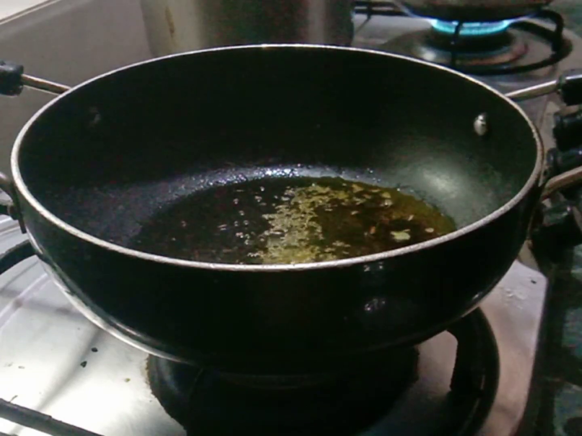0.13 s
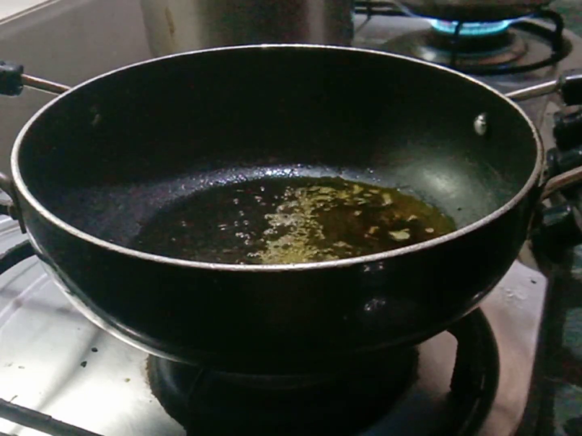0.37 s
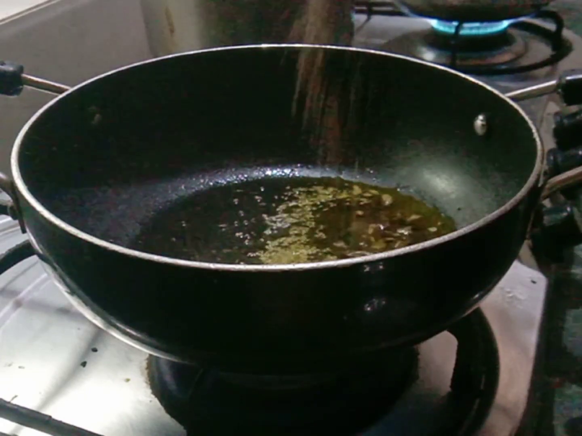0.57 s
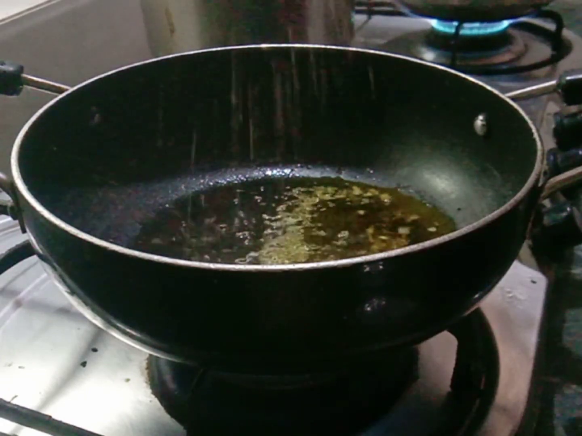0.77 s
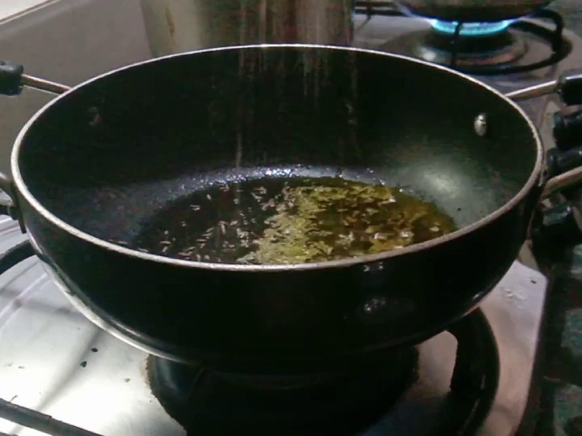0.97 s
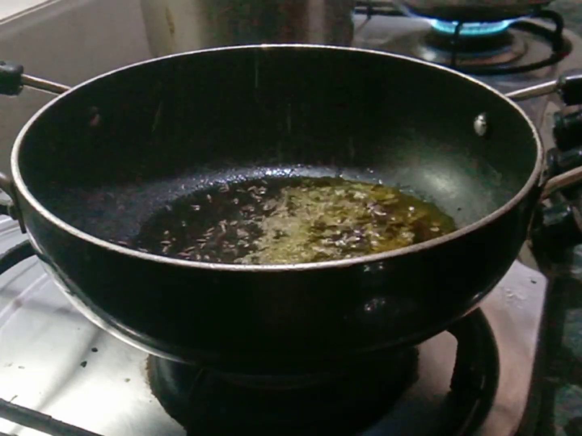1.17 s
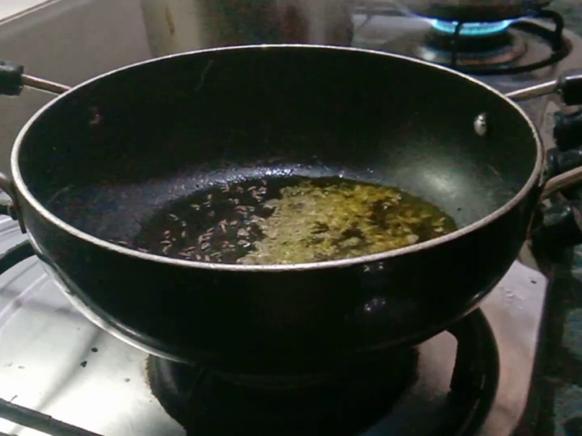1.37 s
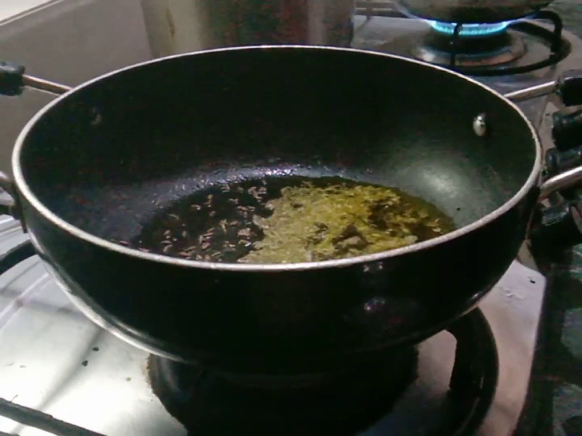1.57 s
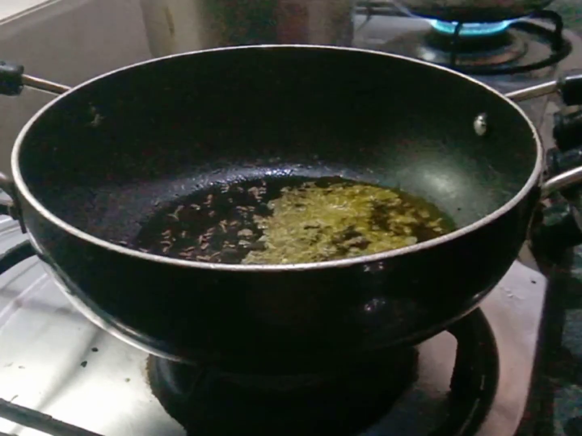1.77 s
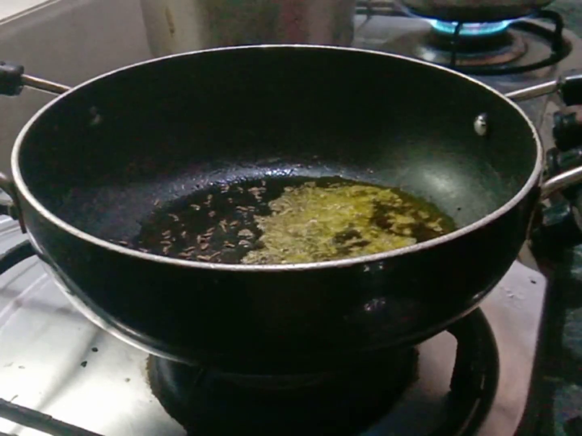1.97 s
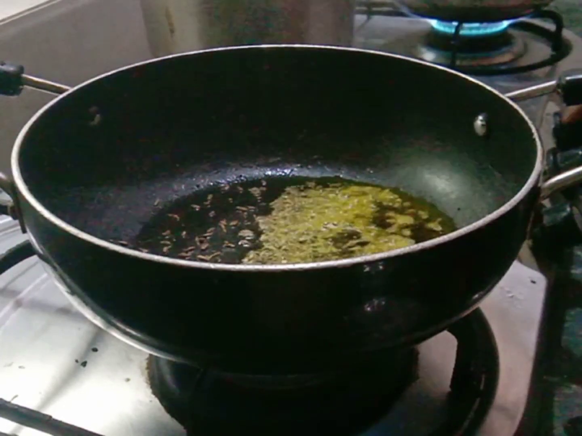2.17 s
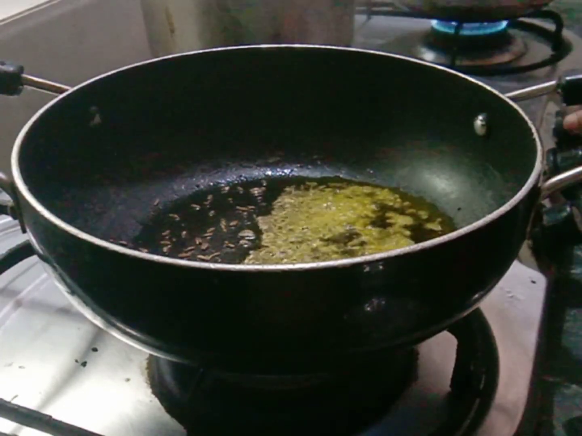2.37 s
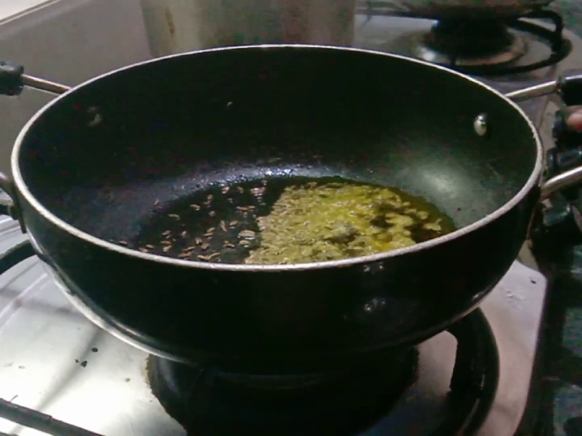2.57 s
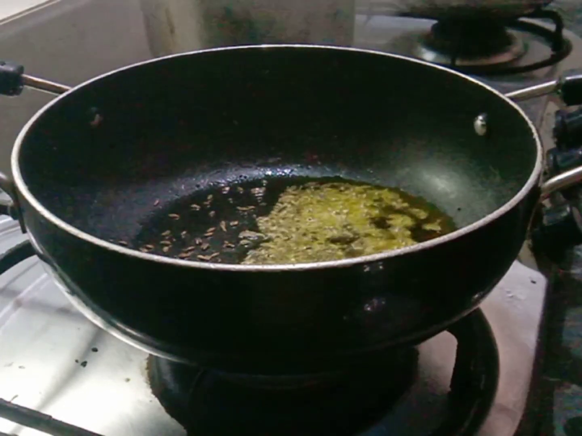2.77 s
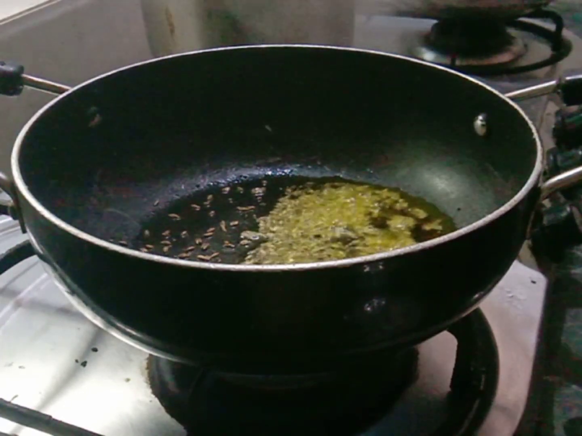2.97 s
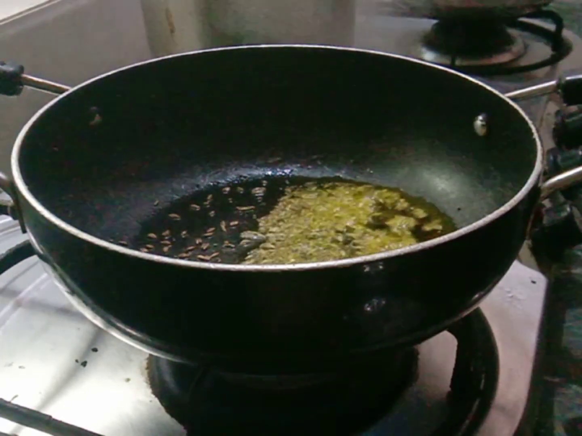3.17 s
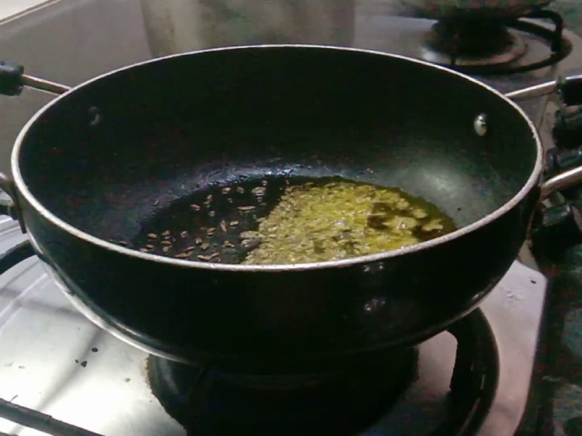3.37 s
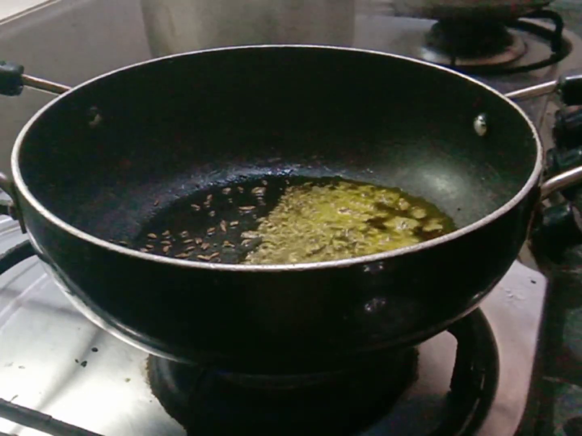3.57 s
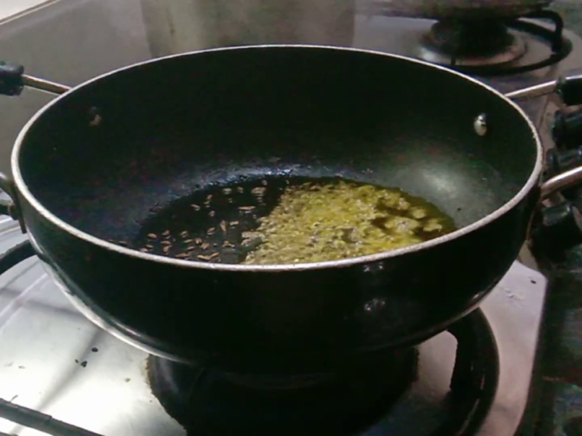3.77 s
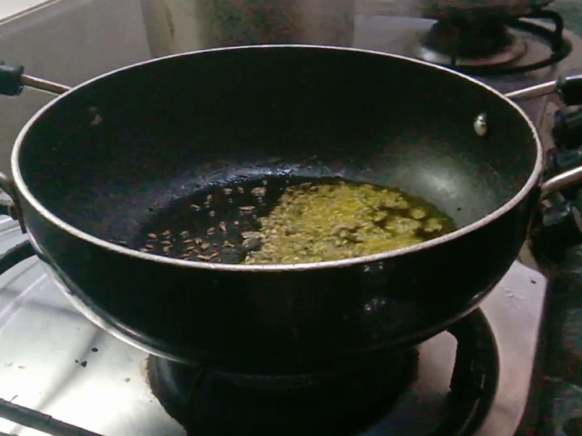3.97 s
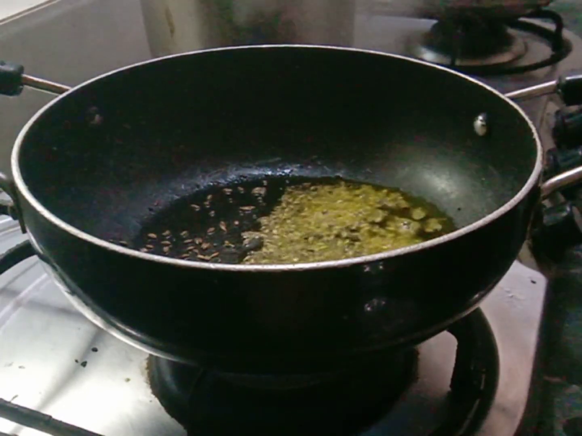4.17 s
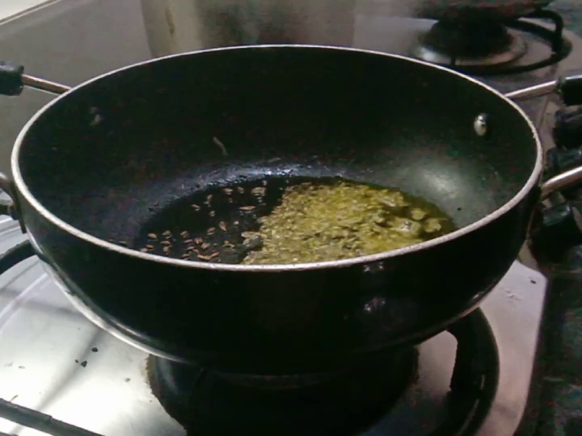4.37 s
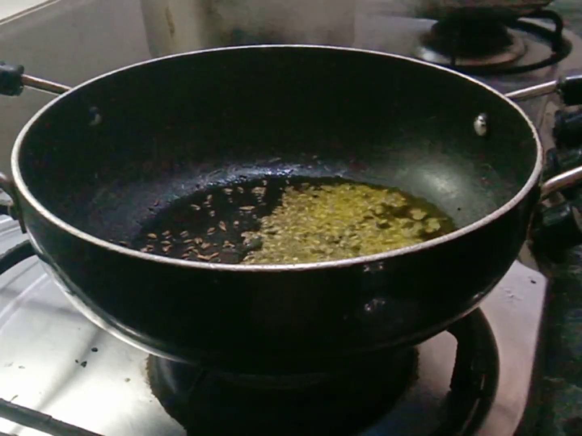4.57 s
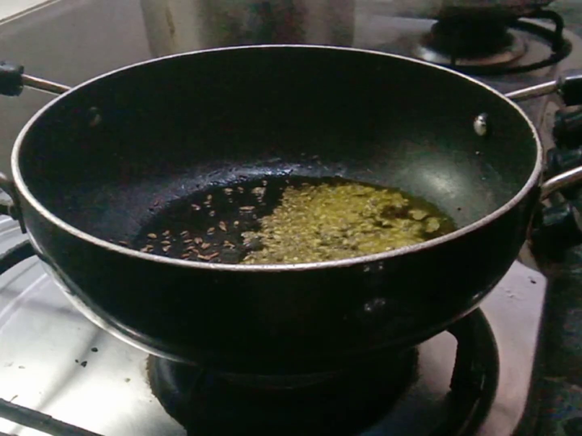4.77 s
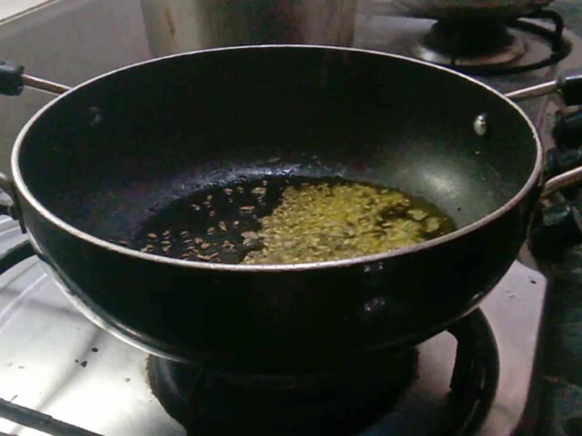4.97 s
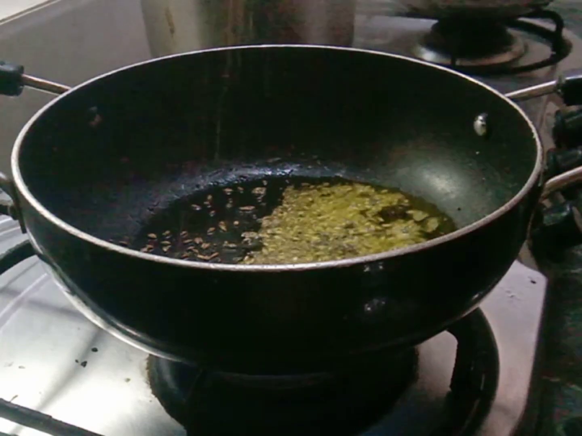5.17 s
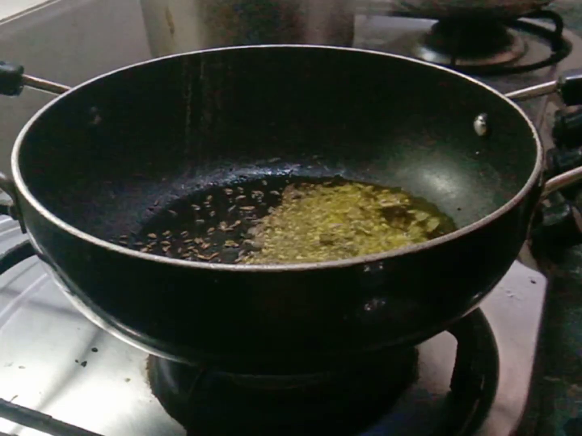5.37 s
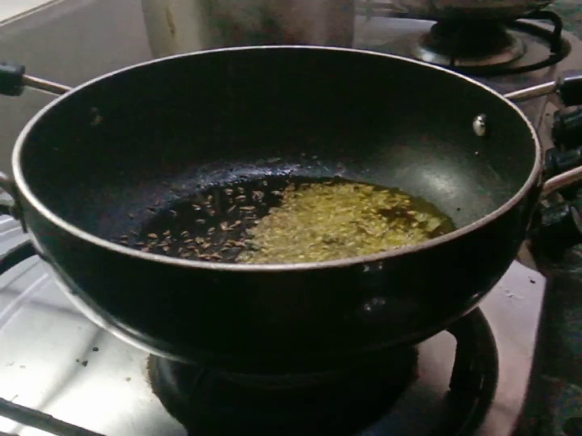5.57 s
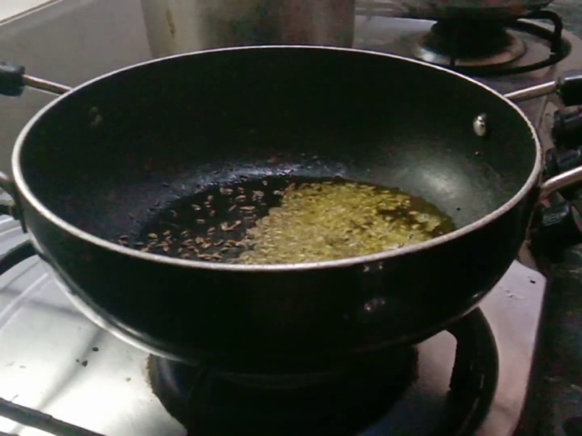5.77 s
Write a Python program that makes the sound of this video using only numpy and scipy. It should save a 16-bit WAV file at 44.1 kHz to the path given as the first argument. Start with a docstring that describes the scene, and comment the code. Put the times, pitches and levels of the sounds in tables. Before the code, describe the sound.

For the first half second, seeds burst in a quick run of sharp, dry pops in a deep pan, over the soft sizzle of simmering oil. At about 0.5 seconds a pressure cooker gives a low puff, and a loud, bright jet of steam swells to full strength by 0.7 seconds. This even, fizzy hiss dominates until the end, near 5.8 seconds, weakening only slightly. Single seed pops poke through around 1 second, at 4.1 seconds and more faintly around 5 seconds. At 2.3 seconds the stove knob makes a quiet, quick double knock. A few soft, low thuds are scattered far beneath the hiss, along with a faint low roar of gas flame and venting steam that fades through the second half. Everything is close to the microphone, in mono, with short kitchen reflections.

```python
"""A pressure cooker lifts its weight: a low puff, then a loud turbulent steam jet that slowly weakens.
Seeds burst in hot oil in a deep pan on the same gas stove, each a brief pressure pulse; most pop before
the jet starts. The stove knob knocks twice. Beneath lie a few soft thuds, the simmering oil and the low
roar of flame and vent. Air resonances of the pan and reflections in the kitchen colour the sound at a
close mono microphone."""
import sys
import numpy as np
from scipy import signal
from scipy.fft import rfft, irfft, next_fast_len
from scipy.io import wavfile
from scipy.ndimage import uniform_filter1d, map_coordinates

SR = 44100
rng = np.random.default_rng(int(sys.argv[2]) if len(sys.argv) > 2 else 0)


def inscribe(sig):
    """Save sig as 16-bit PCM at rate SR to the path in sys.argv[1].

    A 1-D sig is mono; a 2-D sig holds one channel per row.
    Samples are clipped to [-1, 1] before scaling.
    """
    pcm = np.round(np.clip(np.atleast_2d(sig).T, -1, 1) * 32767)
    wavfile.write(sys.argv[1], SR, pcm.astype(np.int16))


N = 256662
TIME = np.arange(N) / SR


# the jet rises as the weight lifts and falls with the pressure: (time [s], hiss [dB], fizz [dB])
JET_LEVELS = [(0.52, -44, -47), (0.54, -33.5, -31), (0.565, -27, -24), (0.61, -21, -17),
              (0.63, -19.5, -15.5), (0.72, -18.5, -13.5), (0.77, -20.5, -13.5), (0.9, -19, -14),
              (1.1, -21, -12.5), (1.35, -22.5, -14.5), (2.0, -21.5, -14.5), (2.7, -21.8, -16),
              (2.9, -22.5, -16.5), (3.2, -22, -16), (4.0, -23.5, -14.5), (4.35, -23, -17),
              (5.0, -25, -17.5), (5.82, -24.5, -20)]
# spectra of the hiss and of the higher fizz: (frequency [Hz], relative level [dB])
HISS_SPECTRUM = [(590, -23.5), (1000, -23), (1250, -14), (1660, -14), (3670, -1.5), (4430, -5),
                 (4820, -1.5), (6220, -2), (7370, 1.5), (9500, -9), (12400, -77), (20900, -120)]
FIZZ_SPECTRUM = [(5000, -45), (8500, -20), (9300, -13), (11000, -11), (13000, -12), (13600, -13),
                 (14000, -12), (14300, -7), (14600, -2), (15000, -1.5), (15500, -2)]
def steam_jet():
    """Turbulence radiates hiss and fizz, modulated by one unsteady flow; puff and knob are mixed in."""
    hiss_db, fizz_db = level_curves(JET_LEVELS)
    flow_db = 0.17 * wobble(14) + 0.42 * wobble(40)
    drops = spatter(share=0.003, spread_db=0.62, t60=0.011)
    hiss = amp(hiss_db + flow_db) * flow_noise(HISS_SPECTRUM, patch_db=0.86, grain=drops ** 0.13)
    fizz_gain = amp(fizz_db + flow_db + 0.36 * wobble(16))
    fizz = fizz_gain * flow_noise(FIZZ_SPECTRUM, patch_db=0.63, grain=drops ** 0.11)
    return hiss + fizz + puff_and_knob(grain=drops ** 0.13)


# a low puff as the weight lifts, then a short double knock of the stove knob:
# (time [s], level [dB], rise [s], hold [s], T60 [s])
PUFF_AND_KNOCKS = [(0.551, -30, 0.038, 0.067, 0.42), (2.304, -28.5, 0.013, 0.007, .04),
                   (2.328, -34, 0.0078, .01, 0.064)]
# their common spectrum: (frequency [Hz], relative level [dB])
PUFF_KNOCK_SPECTRUM = [(120, -54), (200, -27), (635, -7), (1090, -10.5), (1210, -4), (2140, -7.5),
                       (2360, -9), (3000, -14.5), (3900, -31), (6600, -120)]
def puff_and_knob(grain):
    """Transients of one noise band: a long decay is heard as a puff, a short one as a knock."""
    envelope = sum(amp(db) * swell(TIME - onset, *shape) for onset, db, *shape in PUFF_AND_KNOCKS)
    return envelope * flow_noise(PUFF_KNOCK_SPECTRUM, patch_db=2.7, grain=grain)


# bursting seeds: (time [s], relative level [dB], knock offset [dB])
SEED_BURSTS = [(0.0224, -12, -33), (0.0405, -10, -35), (0.0574, -22, -29), (0.102, -18, -32),
               (0.1102, -9.5, -24), (0.12, -13.5, -19), (0.1534, -12, -33), (0.165, -13, -39),
               (0.18, -9.5, -14.5), (0.214, -14.5, -21), (0.262, -20, -27), (0.269, -9, -17),
               (0.3057, -13, -37), (0.3301, -14, -14), (0.3568, -13, -19), (0.4056, -10.5, -38),
               (0.4764, -28, -24), (0.4814, -9.5, -32), (0.5214, -12, -10), (0.528, -10, -31),
               (0.541, -11, -24), (0.989, -1, -24), (1.0982, -6, -26), (4.07, -9, -26), (4.83, -19, -31),
               (4.8994, -16, -26), (5.0508, -11, -24), (5.1786, -19, -26)]
# broad resonances of the microphone ports: (frequency [Hz], bandwidth [Hz], gain [dB])
PORT_MODES = [(3450, 1500, -16), (7240, 12000, -7.5), (15000, 3300, 5)]
def seed_pops():
    """Each burst snaps, sputters and knocks the pan; a source this small radiates little bass."""
    pops, t = np.zeros(N + SR), np.arange(SR // 5) / SR
    for onset, db, knock_db in SEED_BURSTS:
        noise = rng.standard_normal(len(t))
        snap = -decay(t, t60=0.0005) * (1.5 + 0.2 * noise) * np.cos(2 * np.pi * 7000 * t)
        sputter = amp(-15) * decay(t, t60=0.041) * noise
        knock = amp(knock_db - 3) * decay(t, t60=0.018) * np.sin(2 * np.pi * 1250 * t)
        start = round((onset + 0.0004) * SR)  # the snap sounds 0.4 ms after the listed time
        pops[start:][:len(t)] += amp(db - 10.5) * (snap + sputter + knock)
    colour = lambda hz: highpass(hz, corner_hz=2500) * pan_cavity(hz) * resonances(hz, PORT_MODES)
    return filtered(pops[:N], colour)


# soft thuds: (time [s], level [dB], frequency [Hz])
SOFT_THUDS = [(0.18, -44, 304), (0.984, -41, 356), (1.16, -50, 406), (2.179, -41.5, 408), (2.306, -43, 360),
              (2.329, -36, 340), (3.061, -46, 302), (3.499, -49, 99.6), (3.849, -44.5, 330),
              (4.315, -47, 86.1), (5.32, -50, 325), (5.564, -51, 323), (5.695, -44.5, 272)]
def thuds():
    """Each thud is a damped low oscillation with a dull puff; the microphone drops the deepest part."""
    track, t = np.zeros(N + SR), np.arange(SR // 4) / SR
    for onset, db, pitch_hz in SOFT_THUDS:
        puff = 3.5 * uniform_filter1d(rng.standard_normal(len(t)), size=24)
        envelope = amp(db) * (1 - np.exp(-t / 0.0019)) * decay(t, t60=0.1)
        track[round(onset * SR):][:len(t)] += envelope * (np.sin(2 * np.pi * pitch_hz * t) + puff)
    return filtered(track[:N], lambda hz: highpass(hz, corner_hz=30) ** 2)


# spectrum of the bubbling oil: (frequency [Hz], relative level [dB])
OIL_SPECTRUM = [(470, -45), (800, -9), (988, -26), (1230, -10), (1680, -7.5), (3090, -4.5), (4370, -2.5),
                (6910, 2.5), (8010, -0.5), (12500, -3.5), (15400, 1.5)]
def simmering_oil():
    """Many small bubbles superpose into a fine-grained noise."""
    bubbles = spatter(share=0.002, spread_db=1.5, t60=0.013)
    return amp(-40 + 0.44 * wobble(18)) * flow_noise(OIL_SPECTRUM, patch_db=0.8, grain=bubbles ** 0.38)


# roar of flame and vent, weaker once the gas is off: (time [s], level [dB])
ROAR_LEVELS = [(0.0, -55), (0.5, -61.5), (0.6, -31), (0.72, -44), (2.55, -45.5), (2.8, -48), (3.6, -49.5),
               (4.2, -53.5), (5.0, -60.5), (5.82, -59)]
# spectra of the roar and of the deeper rumble: (frequency [Hz], relative level [dB])
ROAR_SPECTRUM = [(120, -52), (200, -8.5), (605, -2.5), (651, -2.5), (1080, -5.5), (1250, -6), (1400, -6.5),
                 (1820, -7), (3080, -120)]
RUMBLE_SPECTRUM = [(18, -47), (30, -23), (123, -0.5), (250, -9), (320, 1), (550, -120)]
def flame():
    """Turbulence of flame and vent radiates a low roar; a lumpy rumble follows its level."""
    roar_db, = level_curves(ROAR_LEVELS)
    roar = amp(roar_db) * flow_noise(ROAR_SPECTRUM, patch_db=3.2, grain=amp(1.2 * wobble(10)))
    lumps = amp(2.3 * wobble(12) + 2.0 * wobble(3.63))
    rumble_db = -62 + 0.8 * (roar_db + 45)
    return roar + amp(rumble_db) * flow_noise(RUMBLE_SPECTRUM, patch_db=4.2, grain=lumps)


# faint steady tone in the kitchen: (frequency [Hz], rms level [dB])
ROOM_TONE = [(861.3, -69.5)]
# noise floor of room and microphone: (frequency [Hz], relative level [dB])
FLOOR_SPECTRUM = [(18, -6), (40, 2), (120, 4), (300, -12), (600, -33)]
def background():
    """A slightly amplitude-modulated sinusoid lies over a low noise floor."""
    tone = sum(amp(db + 1.3 * wobble(9)) * np.sqrt(2) * np.sin(2 * np.pi * hz * TIME)
               for hz, db in ROOM_TONE)
    return tone + amp(-76.5) * flow_noise(FLOOR_SPECTRUM, patch_db=1.5, grain=1)


# air modes of the pan and the stove corner: (frequency [Hz], bandwidth [Hz], gain [dB])
AIR_MODES = [(1215, 40, -1), (1250, 35, 3), (1345, 30, 1), (1776, 35, -4), (1884, 45, -2), (2164, 50, -5),
             (2497, 35, 0), (2723, 60, 0), (2853, 35, 0), (3064, 30, 0), (3242, 20, 1), (3465, 40, 1),
             (3700, 60, -2), (3742, 30, 2), (3991, 25, 0), (4466, 30, -3), (4661, 55, -1), (4980, 60, -2),
             (5415, 50, -5), (5570, 50, -5), (6000, 50, -2), (6240, 55, -4), (6505, 40, -3),
             (6900, 500, -9), (7353, 160, -6), (7782, 40, -3), (8828, 90, -4), (10142, 120, -7),
             (11003, 110, -5), (14690, 130, -5), (15440, 90, -4)]
def pan_cavity(hz):
    """Standing waves in the partly enclosed air reinforce sound near their frequencies."""
    return resonances(hz, AIR_MODES)


# echoes from pan wall, hob and tiles: (delay [s], gain [ratio, negative inverts the pulse])
ECHOES = [(.00045, -.75), (.001, .4), (.0014, -.3), (.0036, -.5), (.0042, .3), (.0055, -.4), (.0068, .25),
          (.0085, .2), (.0118, -.2)]
def early_reflections(x):
    """Delayed copies interfere with the direct sound, forming a comb filter."""
    comb = lambda hz: 1 + sum(gain * np.exp(-2j * np.pi * hz * delay) for delay, gain in ECHOES)
    return filtered(x, comb)


# reverberation time of the kitchen: (frequency [Hz], T60 [s])
KITCHEN_T60 = [(300, 0.2), (3000, 0.083), (14000, 0.085)]
def reverberation(x):
    """The diffuse field decays exponentially, faster in the treble."""
    hz, t, bands = signal.stft(rng.standard_normal(SR // 2), SR, nperseg=256)
    response = signal.istft(bands * decay(t, log_interp(KITCHEN_T60, hz)[:, None]), SR, nperseg=256)[1]
    return signal.fftconvolve(x, response / np.linalg.norm(response))[:N]


def flow_noise(spectrum, patch_db, grain):
    """Unit-rms noise, modulated by random patches and a grain envelope, resonating in the pan."""
    bands = signal.stft(rng.standard_normal(N + 512), nperseg=512)[2]
    patches = uniform_filter1d(rng.standard_normal(bands.shape), size=4, axis=0)  # across frequency
    patches = uniform_filter1d(patches, size=6, axis=1)  # across time
    noise = signal.istft(bands * amp(patch_db * unit_rms(patches)), nperseg=512)[1][:N]
    colour = lambda hz: amp(log_interp(spectrum, hz)) * (hz > spectrum[0][0]) * pan_cavity(hz)
    return unit_rms(filtered(noise * grain, colour))


def spatter(share, spread_db, t60):
    """Shot-noise envelope: droplets burst on a random share of samples and decay, over a steady 1."""
    chance, size = rng.random(N), rng.exponential(size=N)
    bursts = (chance < share) * amp(spread_db * size)
    return 1 + signal.lfilter([1], [1, -decay(1 / SR, t60)], bursts)


def resonances(hz, modes):
    """Modal superposition: the direct sound plus one damped resonator per mode."""
    return 1 + sum(amp(db) * 1j * hz * width / (centre ** 2 - hz ** 2 + 1j * hz * width)
                   for centre, width, db in modes)


def highpass(hz, corner_hz):
    """First-order response, falling 6 dB per octave below the corner."""
    return 1j * hz / (corner_hz + 1j * hz)


def filtered(x, response):
    """Linear filtering multiplies the spectrum by a frequency response."""
    size = next_fast_len(N + SR // 2)
    return irfft(rfft(x, size) * response(np.fft.rfftfreq(size, 1 / SR)), size)[..., :N]


def swell(t, rise, hold, t60):
    """Envelope from t = 0: quadratic rise, hold, exponential release."""
    return np.clip(t / rise, 0, 1) ** 2 * decay(np.maximum(t - rise - hold, 0), t60)


def decay(t, t60):
    """Exponential damping by 60 dB in t60 seconds."""
    return amp(-60 * t / t60)


def wobble(rate_hz):
    """Smooth random modulation with rate_hz knots a second."""
    return map_coordinates(rng.standard_normal(int(N * rate_hz / SR) + 4), [TIME * rate_hz])


def level_curves(rows):
    """Each level column interpolated per sample, silent before the first row."""
    times, *columns = np.transpose(rows)
    return [np.interp(TIME, times, levels, left=-120) for levels in columns]


def log_interp(points, hz):
    """Interpolation on a logarithmic frequency axis."""
    frequencies, values = np.transpose(points)
    return np.interp(np.log(hz + 1), np.log(frequencies + 1), values)


def unit_rms(x):
    """Normalisation to a mean power of 1."""
    return x / np.sqrt(np.mean(x ** 2) + 1e-20)


def amp(db):
    """Amplitude ratio of a level in dB."""
    return 10 ** (np.asarray(db) / 20)


def scene():
    """Sound pressures add at one microphone, which feeds both channels."""
    jet, pops = steam_jet(), seed_pops()
    mono = jet + amp(-11) * reverberation(jet)
    mono += early_reflections(pops) + amp(-6) * reverberation(pops)
    mono += thuds() + simmering_oil() + flame() + background()
    return np.array([mono, mono])


def record(dry):
    """A steep low-pass sets the camera's band limit."""
    cutoff_hz = 15500
    return filtered(dry, lambda hz: 1 / (1 + (hz / cutoff_hz) ** 900))


dry = scene()
out = record(dry)
inscribe(out)
```